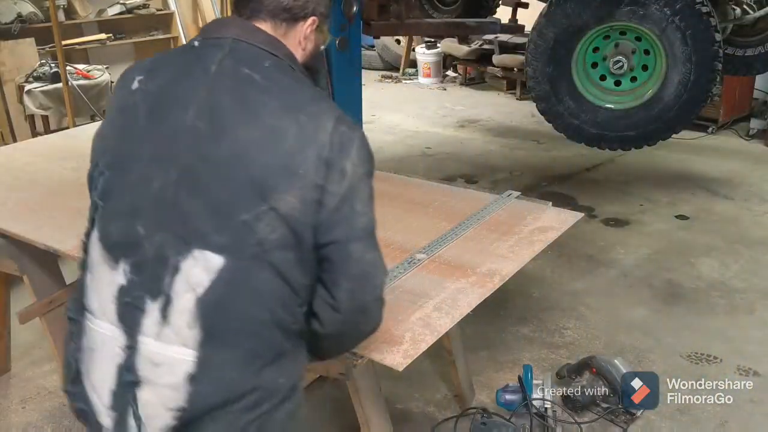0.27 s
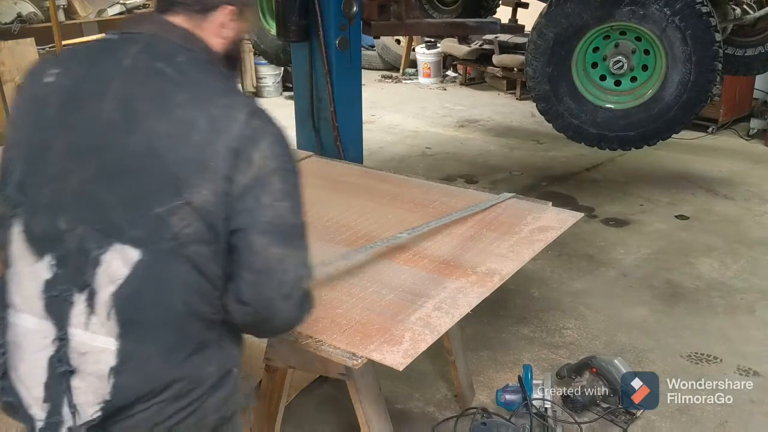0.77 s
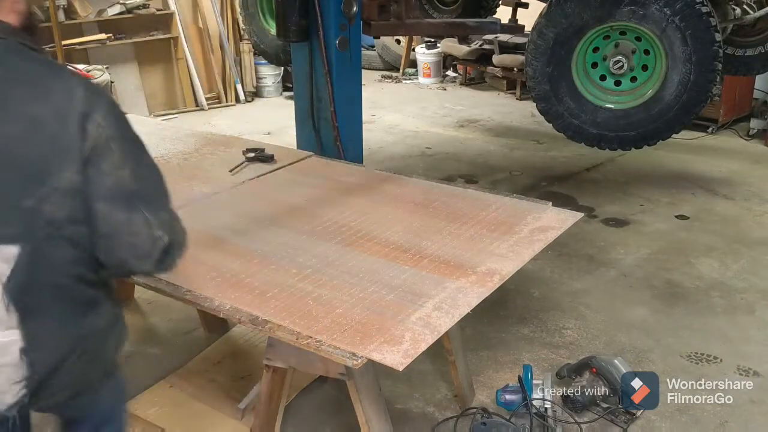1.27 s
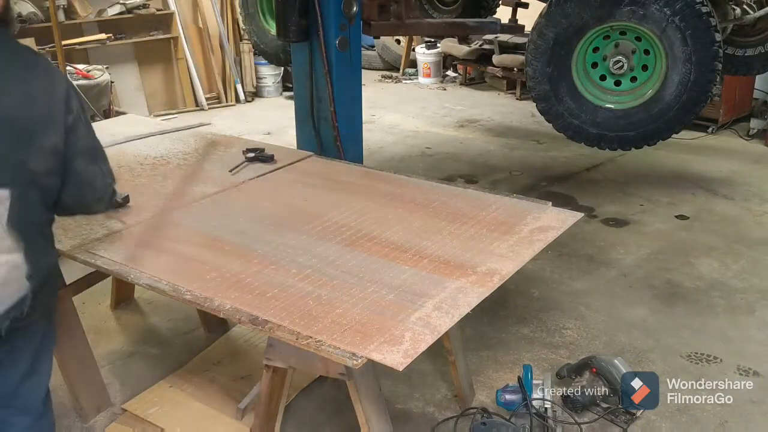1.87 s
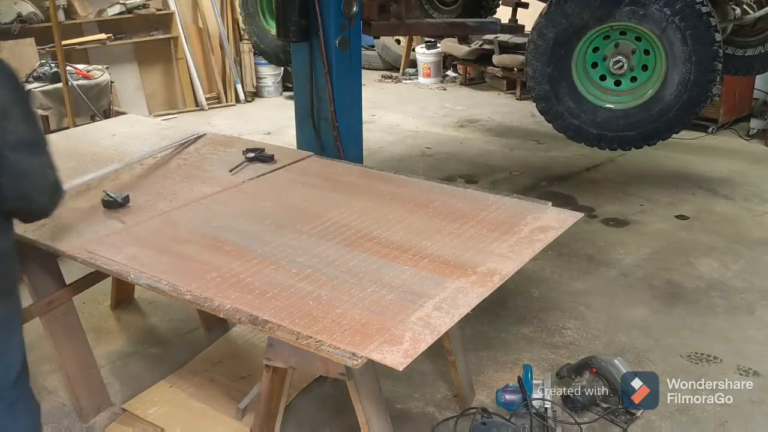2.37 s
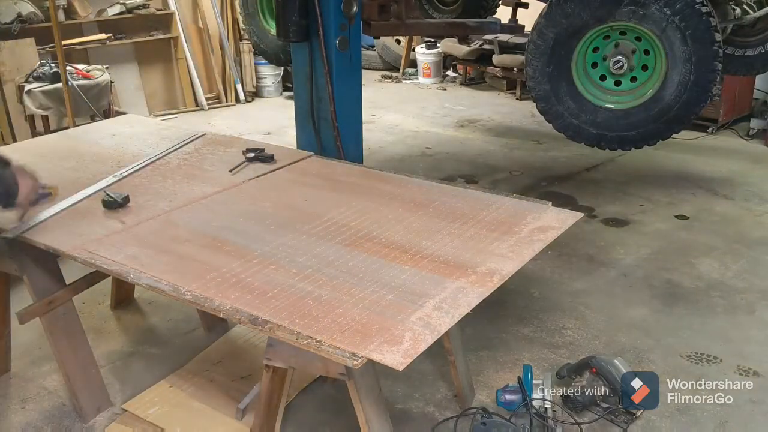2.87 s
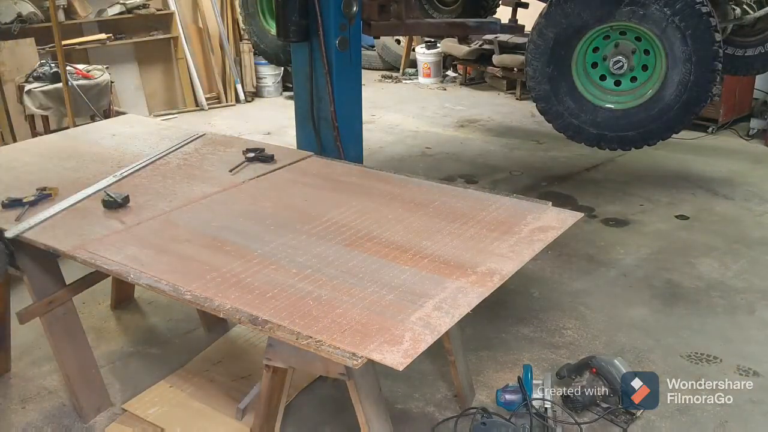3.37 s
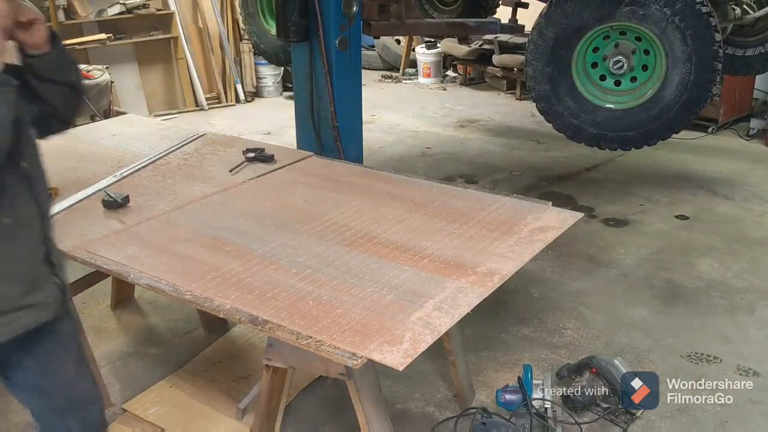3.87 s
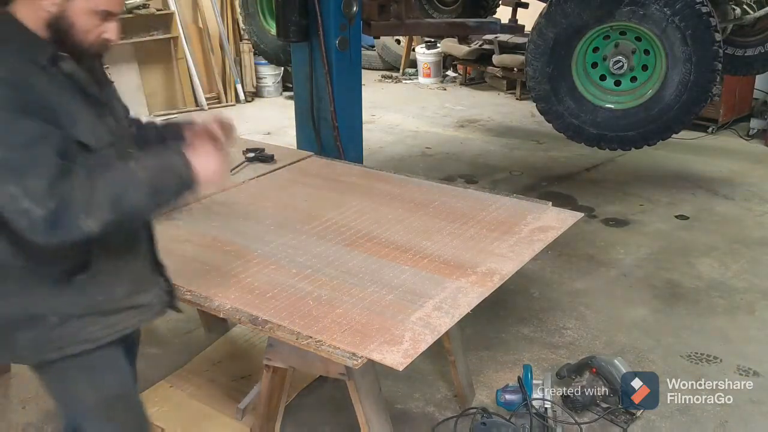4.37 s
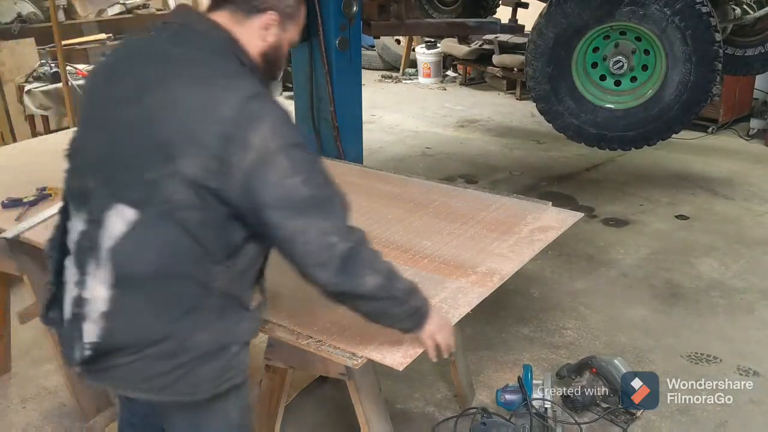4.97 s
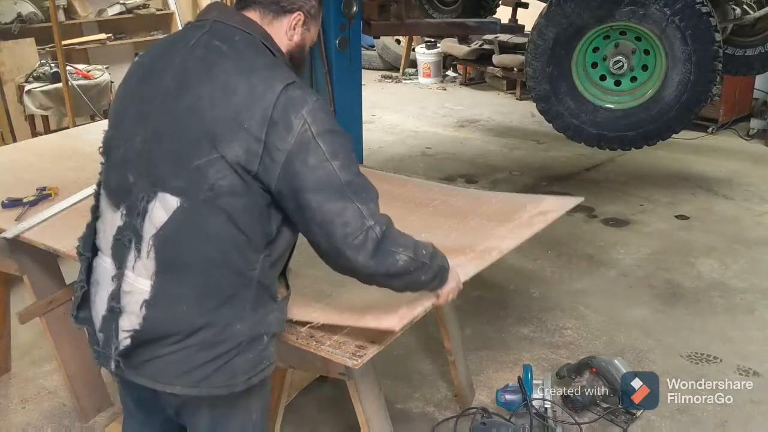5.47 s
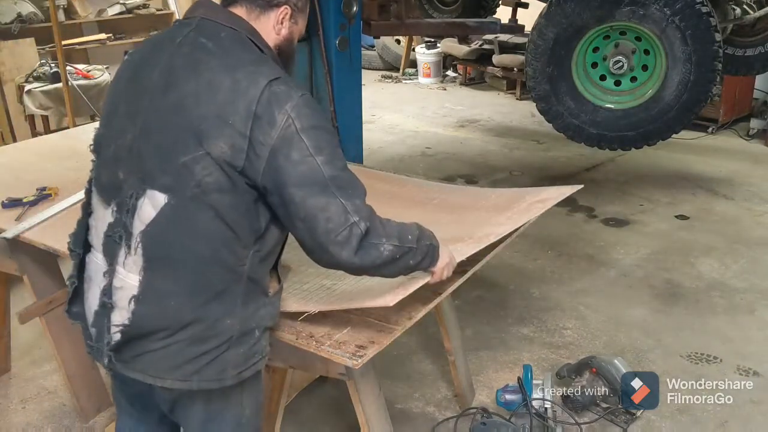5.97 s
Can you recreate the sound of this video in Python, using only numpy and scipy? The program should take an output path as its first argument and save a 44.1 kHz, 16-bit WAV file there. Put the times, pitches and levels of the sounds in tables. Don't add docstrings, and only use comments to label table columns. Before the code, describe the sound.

Knocks and clacks on a thin wooden sheet over sawhorses, loudest mid-way as tools drop, then a short woody drag in an echoing workshop.

```python
import sys
import numpy as np
from scipy import signal
from scipy.io import wavfile

SR = 44100
rng = np.random.default_rng(int(sys.argv[2]) if len(sys.argv) > 2 else 0)


def gain_from_db(level_db):
    decades = np.asarray(level_db, float) / 20
    return 10 ** decades


def unload_audio(sound):
    columns = np.transpose(np.atleast_2d(sound))
    steps = np.round(np.clip(columns, -1, 1) * 32767)
    wavfile.write(sys.argv[1], SR, steps.astype(np.int16))


N = 273596
SPOTS = 3

# (f/Hz, level/dB, t60/s)
PANEL = [(426, 16, 0.0088), (525, -6, 0.1), (529, 8, 0.023), (580, 5.5, 0.037), (657, -1.5, 0.046),
         (757, -2.5, 0.066), (809, 3.5, 0.036), (910, 4, 0.047), (990, 3.5, 0.024), (1050, 3.5, 0.038),
         (1067, 9.5, 0.019), (1253, 7, 0.021), (1425, 11, 0.018), (1483, 4, 0.031), (1620, 9.5, 0.0083),
         (2084, -1, 0.068), (2240, 12, 0.0072)]


def rms_one(x):
    return x / np.sqrt(np.mean(x ** 2) + 1e-20)


def at_hz(points, hz):
    points = np.array(points)
    return np.interp(np.log(hz), np.log(points[:, 0]), points[:, 1])


def band(x, low_hz, high_hz, order=2):
    sos = signal.butter(order, [low_hz, min(high_hz, .45 * SR)], "band", fs=SR, output="sos")
    return signal.sosfilt(sos, x + 1e-18)


def ring(clicks, hz, t60):
    r = gain_from_db(-60 / (t60 * SR))
    w = 2 * np.pi * hz / SR
    return signal.lfilter([0, np.sin(w)], [1, -2 * r * np.cos(w), r * r], clicks + 1e-18)


def drift(rate):
    knots = rng.standard_normal(400)
    return np.interp(np.arange(N) / SR * rate, np.arange(len(knots)), knots)


def stereo_bands(size):
    # (f/Hz, correlation)
    likeness = [(60, 1), (125, 0.76), (200, 0.98), (350, 0.137), (700, 0.033), (1400, 0.53), (2800, 0.0045),
                (8000, 0.028)]
    edges = 20 * 2 ** np.arange(0, 10.1, .5)
    white = rng.standard_normal((2, 2, size + 8192))
    for k, (low, high) in enumerate(zip(edges, edges[1:])):
        mid, side = band(white[k % 2], low, high)[:, 8192:]
        hz = np.sqrt(low * high)
        alike = np.clip(at_hz(likeness, hz), -1, 1)
        yield hz, np.sqrt(1 + alike) * mid + np.sqrt(1 - alike) * side * [[1], [-1]]


def air():
    # (f/Hz, density/dB per Hz)
    colour = [(12, -29), (20, 2.5), (38, -8.5), (91, -11.5), (123, -13), (187, -25.5), (410, -21.5),
              (513, -23), (923, -26.5), (1260, -31), (1960, -34.5), (3530, -41.5), (4300, -37.5),
              (5530, -40.5), (16000, -43.5)]
    # (t/s, level/dB)
    vent = [
        (0.0, -55.5),
        (0.4, -52.5),
        (1.3, -58.5),
        (2.5, -55),
        (3.6, -57.5),
        (5.06, -57.5),
        (6.2, -61),
    ]
    # (f/Hz, level/dB rms)
    mains = [(120, -65.5), (240, -74.5)]
    t = np.arange(N) / SR
    swell_db = np.interp(t, *np.transpose(vent))
    swell_db = swell_db - swell_db.mean()
    rush = 0
    for hz, noise in stereo_bands(size=N):
        flow_db = swell_db * np.clip(300 / hz, .2, 1)
        rush = rush + noise * gain_from_db(at_hz(colour, hz) + 0.64 * drift(11.0) + flow_db)
    hum = 0
    for hz, level_db in mains:
        hum = hum + gain_from_db(level_db + 2.0 + 1.02 * drift(2.5)) * np.sin(2 * np.pi * hz * t)
    return gain_from_db(-52.5) * rms_one(rush) + hum


def hall(spots, clump_db=2.5, build_s=.003):
    # (f/Hz, t60/s)
    hall_t60 = [(60, 0.6), (250, 0.45), (1000, 0.37), (4000, .5), (8000, 0.44), (15000, 0.23)]
    # (f/Hz, level/dB)
    hall_db = [(60, -27), (250, -2), (1000, -4.5), (4000, 5), (15000, -1)]
    t, out = np.arange(SR * 3 // 4) / SR, 0
    for x in spots:
        clumps = np.interp(t * 500, np.arange(501), rng.standard_normal(501))
        echoes = 0
        for hz, noise in stereo_bands(size=len(t)):
            t60 = at_hz(hall_t60, hz)
            energy = np.sqrt(np.log(1000) / (t60 * SR))
            echoes = echoes + noise * energy * gain_from_db(at_hz(hall_db, hz) - 60 * t / t60)
        shape = (1 - np.exp(-t / build_s)) * gain_from_db(clump_db * clumps * np.exp(-t / 0.015))
        out = out + signal.oaconvolve(x[None], echoes * shape, axes=1)[:, :N]
    return out


def stroke(peak_s, level_db, rise_s, fall_s, hold_s=0):
    late = np.arange(N) / SR - peak_s
    rise = -late / max(rise_s, .002)
    fall = (late - hold_s) / max(fall_s, .002)
    return gain_from_db(level_db - 28 * np.maximum(rise, fall).clip(0, 9))


def rubbed_layers(grains_per_s=4500, spread_db=3.0):
    # (low f/Hz, high f/Hz)
    scuff_bands = [(3000, 6500), (6500, 11000), (11000, 17000)]
    grains = (rng.random(N) < grains_per_s / SR) * rng.choice([-1, 1], N)
    grains = grains * gain_from_db(spread_db * np.minimum(rng.exponential(1, N), 4))
    layers = [rms_one(band(grains, low_hz, high_hz, order=4)) for low_hz, high_hz in scuff_bands]
    body = 0
    for hz, level_db, t60 in PANEL:
        tilt_db = -10.0 * abs(np.log2(hz / 1000))
        body = body + gain_from_db(level_db + tilt_db) * ring(grains, hz, t60 * .45)
    rasp = rms_one(band(grains, 1900, 2250))
    return layers, rms_one(body) + gain_from_db(-13.0) * rasp, rasp


def sandy(layers, bright_db, finest_db):
    grit, hiss, finest = layers
    return grit + gain_from_db(0.65 * bright_db) * hiss + gain_from_db(0.94 * bright_db + finest_db) * finest


def brush(rasp):
    # (loudest t/s, level/dB, rise/s, fall/s)
    brushes = [(1.228, -56.5, 0.095, 0.036)]
    return rasp * sum(stroke(*row) for row in brushes)


def scuffs(layers):
    # (start t/s, grit/dB, hold/s, fall/s, brightness/dB)
    catches = [
        (0.715, -48, 0.0058, 0.028, 5),
        (2.176, -54, 0.0091, 0.024, 14),
        (4.023, -49, 0.025, 0.058, 2),
        (5.813, -37.5, 0.037, 0.074, -3),
    ]
    out = 0
    for s, grit_db, hold_s, fall_s, bright_db in catches:
        gain = stroke(s, grit_db - 8.5, .003, fall_s, hold_s)
        out = out + gain * sandy(layers, bright_db, finest_db=-5)
    return out


def slides(layers, body):
    # (loudest t/s, grit/dB, rise/s, fall/s, brightness/dB)
    slide_strokes = [(0.13, -46, 0.029, 0.076, 0), (0.27, -44.5, 0.21, 0.12, -13.5),
                     (0.87, -58.5, 0.47, 0.56, 0.5), (1.24, -55.5, 0.24, 0.078, -14),
                     (1.71, -57, 0.12, 0.24, -1), (2.43, -51, .02, 0.09, -11),
                     (2.53, -60.5, 0.19, 0.059, 1.2), (2.71, -46.5, 0.16, 0.3, -9),
                     (4.31, -55, 0.27, 0.29, -5), (4.689, -50.5, .05, 0.077, 10.5),
                     (4.76, -55, 0.13, 0.18, -2.5), (5.4, -59.5, .1, 0.17, 1)]
    out = 0
    for s, grit_db, rise_s, fall_s, bright_db in slide_strokes:
        rubbed = sandy(layers, bright_db, finest_db=5) + gain_from_db(5.5) * body
        out = out + stroke(s, grit_db - 6.5, rise_s, fall_s) * rubbed
    return out


def drag(layers, body):
    # (t/s, pressure as wood level/dB, grit against wood/dB)
    pull = [
        (4.993, -55, -32),
        (5.003, -30, -25),
        (5.06, -33, -29),
        (5.11, -31, -2.5),
        (5.15, -26, -5),
        (5.24, -28.5, -19.5),
        (5.299, -31.5, -16),
        (5.359, -58, -6),
        (5.42, -89, -5),
    ]
    s, wood_db, grit_db = np.transpose(pull)
    t = np.arange(N) / SR
    pressure = gain_from_db(np.interp(t, s, wood_db - 6, left=-120, right=-120) + 1.9 * drift(60))
    grit = gain_from_db(np.interp(t, s, grit_db - 6.5)) * sandy(layers, bright_db=-19, finest_db=-11)
    return pressure * (body + grit)


def rubbing():
    layers, body, rasp = rubbed_layers()
    return brush(rasp) + slides(layers, body) + scuffs(layers) + drag(layers, body)


def thumps():
    # (t/s, thump/dB, pitch f/Hz, damping with 1 = free)
    bounces = [(0.104, -37, 224, 1.2), (0.156, -28, 180, 3), (0.208, -34, 233, 3.1),
               (0.304, -19.5, 195, 1.07), (0.333, -20.5, 218, 3), (0.607, -25, 177, 1.26),
               (0.659, -29.5, 117, 1.14), (1.027, -33.5, 176, 1.6), (1.807, -44, 192, 1.8),
               (2.226, -34.5, 246, 0.68), (2.255, -24.5, 135, 2.4), (2.412, -38, 153, 0.34),
               (2.441, -27, 127, 1.9), (2.491, -33, 225, 1.8), (2.776, -13, 316, 0.96),
               (2.793, -12, 132, 0.69), (3.044, -24, 272, 1.4), (3.084, -23, 280, 0.79),
               (3.094, -14, 129, 0.98), (3.219, -27, 143, 1.34), (3.845, -59, 320, 1.6),
               (4.016, -38, 224, 2.9), (4.656, -32, 322, 2.3), (4.689, -59, 295, 1.2),
               (4.847, -36.5, 218, 2.1), (4.993, -36, 224, 1.6), (5.028, -37, 223, 1.26),
               (5.138, -58, 380, 1.6), (5.21, -38.5, 127, 0.48)]
    # (f/Hz, level/dB, t60/s)
    sheet = [(62, -1, 0.22), (76, -2, 0.62), (126.4, -0.5, 0.22), (148.2, 5.5, 0.12), (183.5, -0.5, 0.25),
             (221.7, 6.5, 0.11), (268.3, -1, 0.23), (310.5, -0.5, 0.26), (341, -3, 0.034)]
    out = np.zeros(N)
    t = np.arange(SR // 2) / SR
    for start, level_db, centre_hz, damp in bounces:
        modes = 0
        for hz, mode_db, t60 in sheet:
            spot_db = -20.0 * abs(np.log2(hz / centre_hz))
            decay_db = -60 * t * max(damp, .2) / t60
            modes = modes + gain_from_db(mode_db + spot_db + decay_db) * np.sin(2 * np.pi * hz * t)
        at = int(start * SR)
        out[at:at + len(t)] += gain_from_db(level_db - 3.0) * (1 - np.exp(-t / 0.0032)) * modes
    return band(out, 67, 540)


def every_blow():
    # (t/s, knock/dB, knock f/Hz, clack/dB, tick/dB)
    rule_knocks = [(0.297, -29, 740, -17.5, -58), (0.304, -22.5, 890, -39, -18),
                   (0.335, -38.5, 1380, -26.5, -65), (0.597, -25.5, 490, -34, -45),
                   (0.614, -31, 493, -52, -47), (0.716, -40, 570, -35, -39), (2.178, -54, 514, -41, -53),
                   (2.493, -36, 467, -64, -41.5)]
    clamp_drops = [(2.774, -9.5, 535, -22, -41.5), (2.783, -8.5, 630, -36.5, -26.5),
                   (2.794, -22.5, 530, -35.5, -47.5), (2.819, -11.5, 567, -23.5, -26.5),
                   (3.043, -10.5, 904, -13, -21), (3.078, -6, 1150, -7, -31), (3.083, -7, 836, -4, -16),
                   (3.096, -8.5, 910, -7, -19), (3.223, -25.5, 900, -26, -75),
                   (3.287, -30.5, 514, -60, -71), (3.409, -39, 870, -71, -63)]
    hand_taps = [(4.654, -37.5, 510, -40, -42), (5.0005, -27, 910, -52, -66), (5.032, -21, 955, -38, -61),
                 (5.074, -24.5, 990, -29.5, -60), (5.138, -21, 1110, -25, -61),
                 (5.209, -21, 1090, -21, -54), (5.265, -31.5, 446, -52, -44)]
    edge_taps = [(0.1105, -32.5, 430, -40.5, -56), (0.1595, -34.5, 546, -56, -56),
                 (1.030, -42.5, 537, -58, -66), (2.2292, -21, 910, -31, -51), (2.4128, -27, 750, -34, -47),
                 (3.850, -42, 696, -43, -66), (4.021, -45.5, 444, -58, -52), (4.852, -40, 614, -58, -59),
                 (4.9955, -21, 1100, -55, -70), (5.8155, -42.5, 1130, -32, -45)]
    objects = [(rule_knocks, 2.34), (clamp_drops, 1.06), (hand_taps, 2.4), (edge_taps, 0.5)]
    return np.array([(*row, reach_db, kind) for kind, (rows, reach_db) in enumerate(objects) for row in rows])


def strikes(level_db, chatter_s, chatter=0.61, reach_db=0.0, count=5):
    s, far_db = every_blow()[:, [0, 5]].T
    draws = rng.random((len(s), 2 * count))
    clicks = np.zeros((1 + SPOTS, N))
    late = draws[:, :count] * (np.arange(count) > 0)
    bounce = chatter * (2 * draws[:, count:] - 1) * np.exp(-2.5 * late)
    size = np.where(late > 0, bounce, 1)
    at = ((s[:, None] + late * chatter_s) * SR).astype(int)
    np.add.at(clicks[0], at, size * gain_from_db(level_db)[:, None])
    spot = 1 + np.arange(len(s)) % SPOTS
    clicks[spot, (s * SR).astype(int)] = gain_from_db(level_db + far_db + reach_db)
    return clicks


def knocks():
    _, knock_db, knock_hz, *_ = every_blow().T
    out = 0
    for k, (hz, level_db, t60) in enumerate(PANEL):
        chance_db = 2 * rng.standard_normal(len(knock_db))
        spot_db = chance_db - 9.8 * np.abs(np.log2(hz / knock_hz))
        contacts = strikes(knock_db + level_db + spot_db - 12.5, .025, chatter=1.0, reach_db=4.0, count=9)
        out = out + (-1) ** k * ring(contacts, hz, t60)
    return band(out, 283, 1990, order=3)


def clacks():
    clack_db = every_blow()[:, 3]
    return band(strikes(clack_db + 7.0, 0.026, chatter=0.12, reach_db=10.5, count=40), 1600, 6350)


def ticks():
    tick_db, kind = every_blow()[:, [4, 6]].T
    out = 0
    for mine, top_hz in [(kind == 0, 10490), (kind != 0, 12920)]:
        level_db = np.where(mine, tick_db + 9, -200)
        contacts = strikes(level_db, 0.035, chatter=1.0, reach_db=8.5, count=40)
        out = out + band(contacts, 3690, top_hz, order=3)
    return out


def first_contact():
    s, knock_db, _, clack_db, _, far_db, kind = every_blow().T
    at, is_edge = (s * SR).astype(int), kind == 3
    snap, edge_click = np.zeros(N), np.zeros(N)
    snap[at] = gain_from_db(knock_db + np.where(is_edge, 22.0, 7.0 - 1.2 * far_db))
    edge_click[at] = is_edge * gain_from_db(clack_db + 7.0)
    return band(edge_click, 1100, 7300, order=1) - band(snap, 300, 1400, order=2)


def free_ends():
    # (t/s, level/dB, f/Hz, t60/s)
    rings = [(0.159, -40, 696, 0.032), (0.302, -32.5, 1454, 0.049), (0.304, -35, 3460, 0.038),
             (0.602, -34.5, 2104, 0.029), (.61, -29.5, 404, 0.05), (2.228, -34.5, 517, 0.085),
             (2.229, -35, 973, 0.097), (2.412, -32, 980, 0.025), (2.777, -29, 624, 0.08),
             (2.78, -16, 1390, 0.025), (2.79, -28, 708, 0.064), (3.042, -16.5, 886, 0.067),
             (3.083, -19, 777.8, 0.03), (3.223, -43, 736, 0.071), (3.41, -47.5, 900, 0.077),
             (4.852, -40, 614, 0.024), (4.996, -31.5, 1080, 0.098), (5.032, -33.5, 886, 0.061),
             (5.074, -32, 900, 0.11), (5.138, -36, 1050, 0.11), (5.21, -37, 940, 0.13),
             (5.265, -34, 954, 0.058)]
    out = np.zeros(N)
    for start, level_db, hz, t60 in rings:
        click = gain_from_db(level_db) * (np.arange(N) == int(start * SR))
        out += ring(click, hz, t60) - 0.54 * ring(click, hz * 1.15, t60)
    return out


def blows():
    out = knocks() + clacks() + ticks()
    out[0] += first_contact()
    out[[0, 2]] += free_ends()
    return out


def scene():
    # (t/s, left minus right level/dB)
    side = [(0.0, 3), (0.26, 2), (2.02, 1), (2.85, 2.2), (3.02, 4), (5.02, 1), (5.8, 3.5)]
    thump, (knock, *spots), rub = thumps(), blows(), rubbing()
    side_db = np.interp(np.arange(N) / SR, *np.transpose(side))
    place = gain_from_db(side_db * np.array([[.5], [-.5]]))
    near = (knock + gain_from_db(-4.5) * rub) * place
    near[0] = np.roll(near[0], -6)
    spots[0] = spots[0] + gain_from_db(-3.5) * thump + gain_from_db(-3.5) * rub
    return thump + near + hall(spots) * place ** 0.1 + air()


def top_cut(x):
    return signal.sosfilt(signal.butter(12, 16370, fs=SR, output="sos"), x)


def record(dry):
    # (f/Hz, width/Hz, gain/dB)
    port = [(101.3, 16, -18), (3460, 1330, 7.5), (5664, 370, 9), (7610, 432, 7), (9430, 1430, 7),
            (11630, 160, 10.5)]
    wet = dry
    for hz, width_hz, gain_db in port:
        r, w = np.exp(-np.pi * width_hz / SR), 2 * np.pi * hz / SR
        peak = signal.lfilter([(1 - r * r) / 2, 0, (r * r - 1) / 2], [1, -2 * r * np.cos(w), r * r], dry)
        wet = wet + (gain_from_db(gain_db) - 1) * peak
    top = band(wet, 5000, 17000, order=1)
    wet = wet + top * np.array([[.3], [-.45]])
    wet = 1.05 * np.tanh(wet / 1.05)
    wet = signal.sosfilt(signal.ellip(12, .5, 60, 15850, fs=SR, output="sos"), wet)
    return top_cut(wet)


dry = scene()
out = record(dry)
unload_audio(out)
```